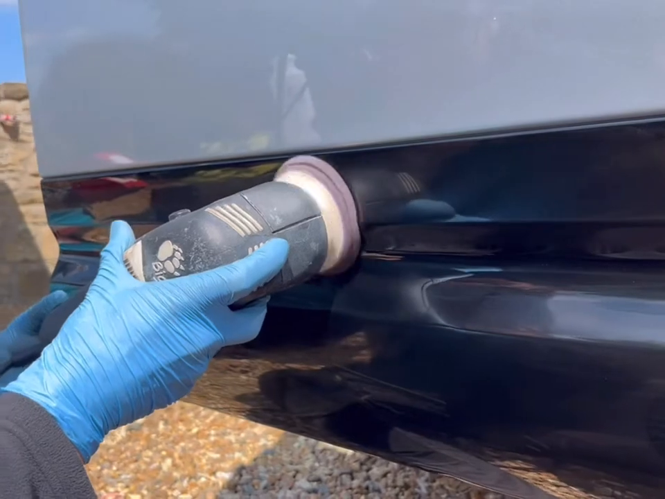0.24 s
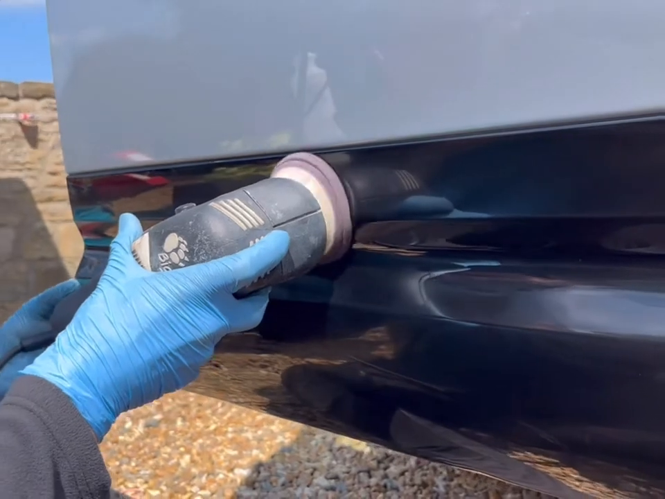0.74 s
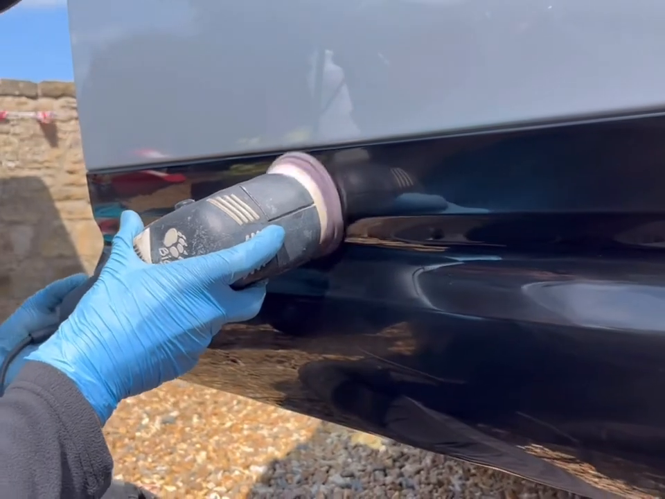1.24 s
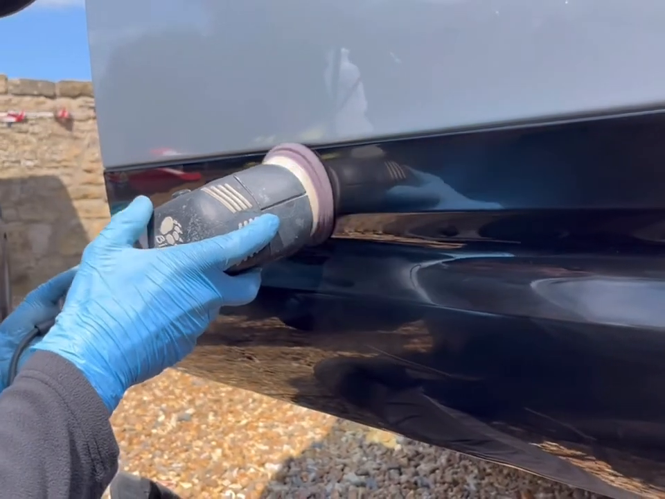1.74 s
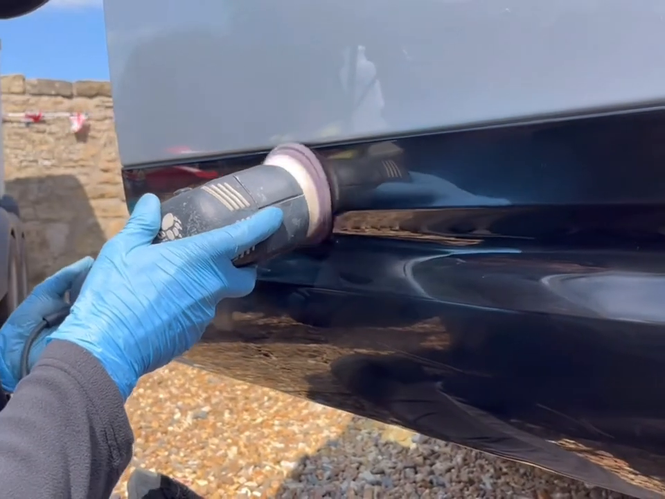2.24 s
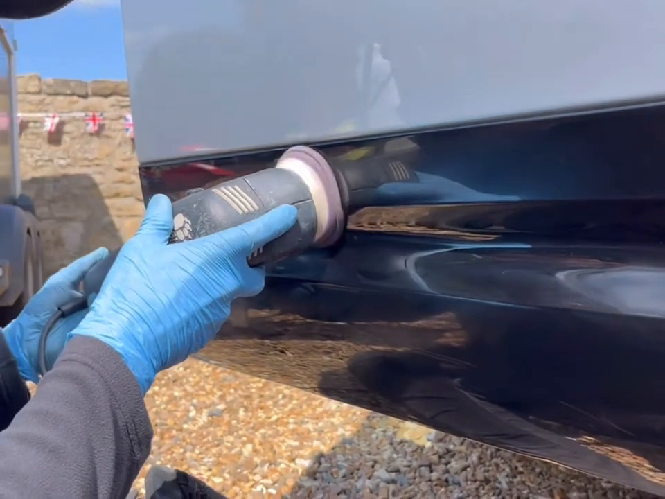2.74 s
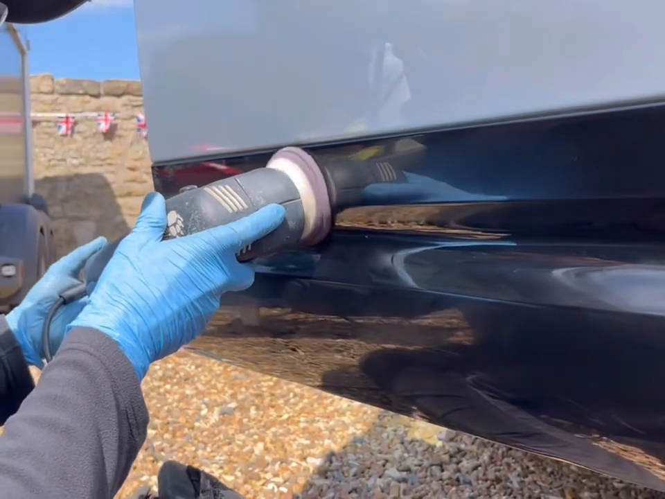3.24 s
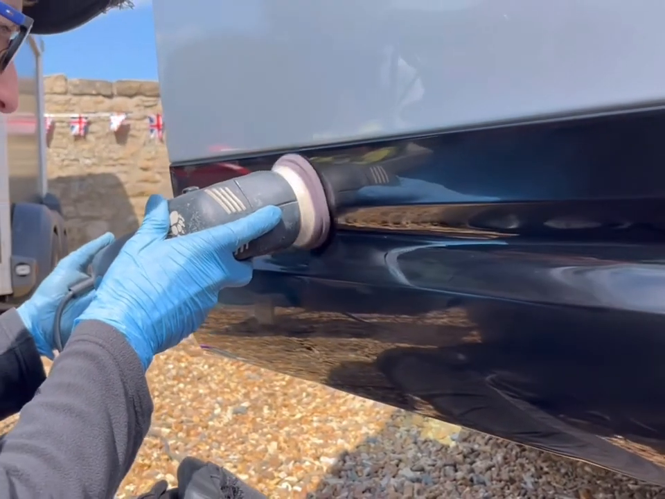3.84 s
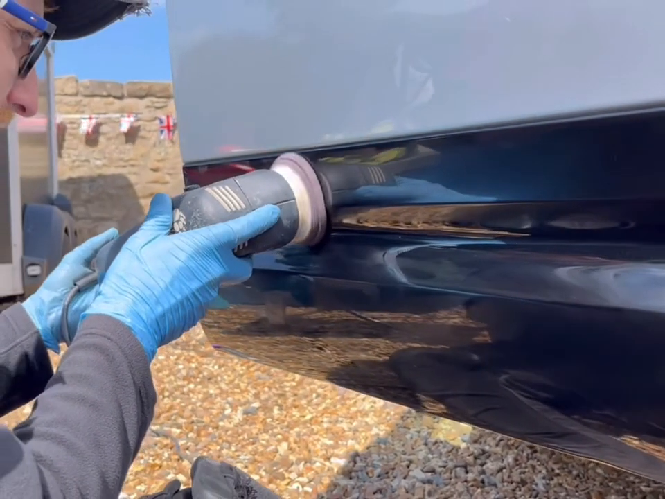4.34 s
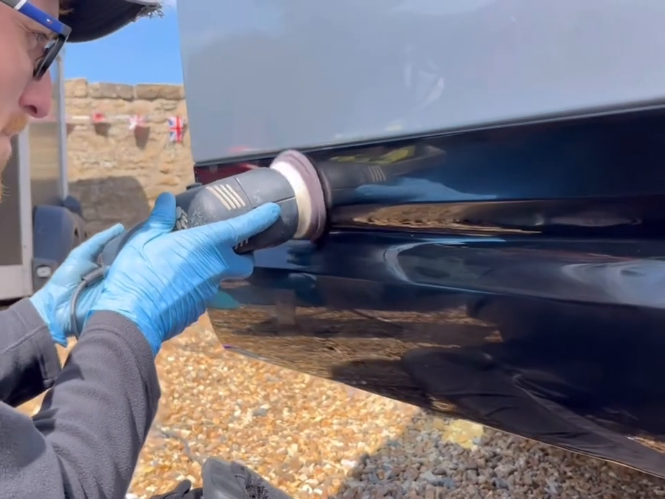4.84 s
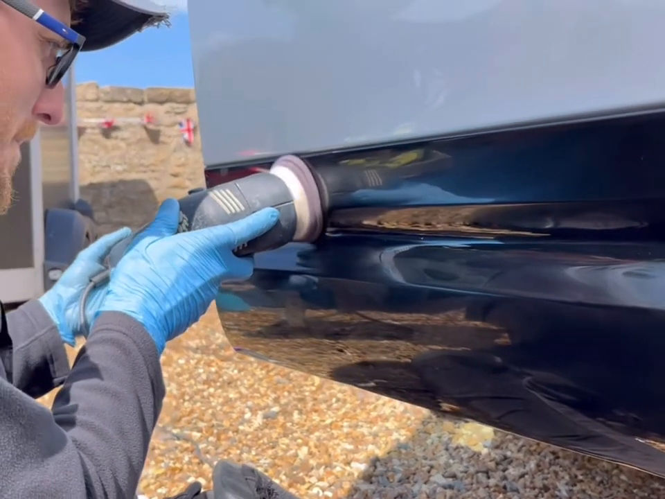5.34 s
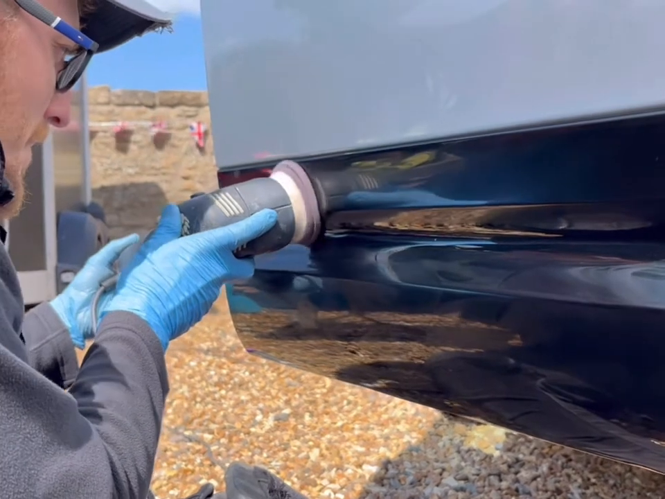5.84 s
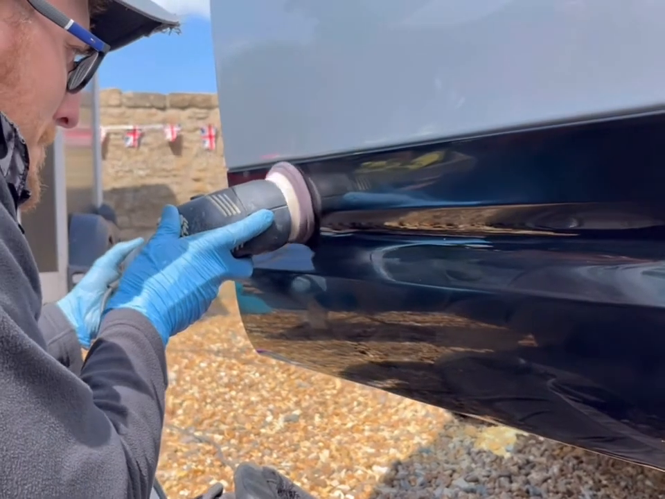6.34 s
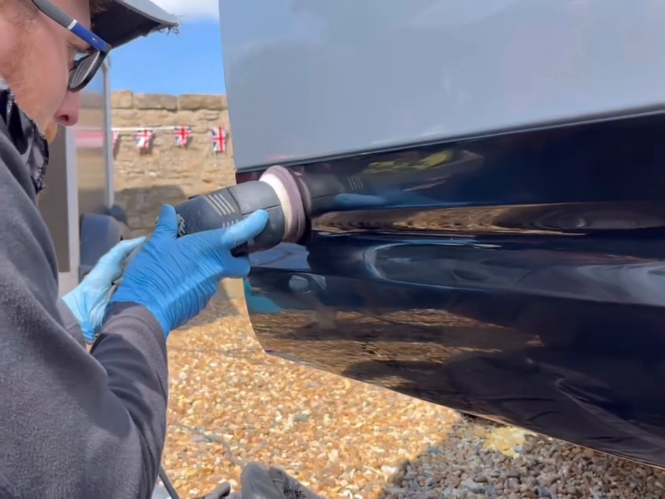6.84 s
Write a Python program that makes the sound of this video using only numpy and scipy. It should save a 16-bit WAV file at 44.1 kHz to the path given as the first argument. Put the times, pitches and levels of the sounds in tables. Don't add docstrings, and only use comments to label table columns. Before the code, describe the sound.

Close phone pickup in open air of a power buffer working on a vehicle body. A deep droning hum from the vibrating panel dominates, strongest around two seconds, beneath a nearly constant metallic whine, rattly casing buzz and breathy cooling-air hiss. Low wind puffs hit the microphone early and become sparse. The machine gradually gets a little quieter and thinner, still running at the end.

```python
import sys
import numpy as np
from scipy import signal
from scipy.fft import rfft, irfft, next_fast_len
from scipy.io import wavfile
from scipy.ndimage import uniform_filter1d

SR = 44100
rng = np.random.default_rng(int(sys.argv[2]) if len(sys.argv) > 2 else 0)


def wrap_up_sound(samples):
    columns = np.atleast_2d(samples).T
    tamed = np.clip(columns, -1, 1)
    steps = np.round(tamed * 32767).astype(np.int16)
    wavfile.write(sys.argv[1], SR, steps)


def rack_gain(trim_db):
    fader = np.asarray(trim_db, float)
    return 10 ** (fader / 20)


N = 313551
TIME = np.arange(N) / SR
COARSE = TIME[::32]
SIZE = next_fast_len(N)
HZ = np.maximum(np.fft.rfftfreq(SIZE, 1 / SR), 1)
PINION_TEETH, CROWN_TEETH = 9, 43
MAINS_RIPPLE_HZ = 100


def curves(table):
    s, *columns = np.transpose(table)
    return [np.interp(TIME, s, column) for column in columns]


def across(table):
    hz, *columns = np.transpose(table)
    return [np.interp(np.log(HZ), np.log(hz), column) for column in columns]


def unit(x):
    return x / np.sqrt(np.mean(x ** 2))


def turn(hz):
    return 2 * np.pi * np.cumsum(hz * np.ones(N)) / SR


def pad_turn(shaft):
    return shaft * PINION_TEETH / CROWN_TEETH


def bell(s, length_s):
    return np.exp(-((TIME - s) / length_s) ** 2)


def walk(rate, coarse=False):
    hold = int(1 / COARSE[1] / rate)
    slow = np.repeat(rng.standard_normal(len(COARSE) // hold + 1), hold)
    slow = uniform_filter1d(uniform_filter1d(slow, hold), hold)
    slow = unit(slow[:len(COARSE)])
    return slow if coarse else np.interp(TIME, COARSE, slow)


def coloured(table):
    spectrum = rfft(rng.standard_normal((2, SIZE))) * rack_gain(across(table)[0])
    return unit(irfft(spectrum, SIZE)[:, :N])


def ring(hz, width_hz):
    slow = rng.standard_normal((2, N)) + 1j * rng.standard_normal((2, N))
    pole = np.exp(-1.55 * np.pi * width_hz / SR)
    slow = signal.lfilter([1], np.convolve([1, -pole], [1, -pole]), slow)
    return unit((slow * np.exp(1j * turn(hz))).real)


def throb(shaft, orbit, ripple, spin, flicker_db):
    beat = 1 + orbit * np.cos(pad_turn(shaft))
    beat = beat + ripple * np.cos(turn(MAINS_RIPPLE_HZ)) + spin * np.cos(shaft)
    return beat * rack_gain(flicker_db * walk(28))


# time in seconds, orbit tone in dB,
# second harmonic from the pad's tilt in dB against that tone.
DRUMMING = [(0, -18, -20), (.35, -13.5, -24.5), (.6, -14.6, -22), (1, -14, -22.5), (1.45, -13, -24),
            (1.6, -12.7, -22.5), (2.1, -12, -20.5), (2.35, -13, -21), (2.65, -14.5, -18.5),
            (3.1, -14.2, -20.5), (3.5, -16, -21), (3.8, -16.4, -22), (4.1, -15, -26.5), (4.7, -16, -28),
            (5.1, -17, -29.5), (5.8, -19, -31.5), (6.5, -19, -39), (7.11, -20.3, -37)]
# time in seconds, length in seconds, change in dB.
STILL_SPOTS = [
    (.62, 0.11, -14),
    (2.3, 0.34, -22),
    (3.7, .3, -0.5),
]
# time in seconds, change in dB.
HUM_DIPS = [(.025, -3), (.05, -3.5), (.112, -4), (.198, -2), (.5, -4), (.72, -1), (.83, -1), (1.1, -2),
            (1.335, -2), (1.43, 0.5)]


def panel(shaft):
    pad = pad_turn(shaft)
    steady_db, tilt_db = curves(DRUMMING)
    first_db = steady_db + sum(db * bell(s, length_s=.015) for s, db in HUM_DIPS)
    second_db = steady_db + tilt_db
    third_db = steady_db - 29.5 - 1.0 * TIME
    third_db = third_db + sum(db * bell(s, length) for s, length, db in STILL_SPOTS)
    fourth_db = -49 - 3 * TIME
    drum = rack_gain(first_db + 0.41 * walk(9)) * np.cos(pad)
    drum = drum - rack_gain(second_db + 0.38 * walk(4.6)) * np.cos(2 * pad)
    drum = drum + rack_gain(third_db + 1.1 * walk(10)) * np.cos(3 * pad)
    drum = drum + rack_gain(fourth_db + 1.5 * walk(3.8)) * np.cos(4 * pad)
    return np.sqrt(2) * drum


# armature multiple, depth in dB, swings per second, starting point in turns.
FRINGES = [(2, 2.2, 0.12, 0.59), (6, 6.7, 0.14, 0.64), (6, 1.5, 0.33, 0.93), (7, 6.9, 0.13, 0.73),
           (7, 2.4, 0.72, 0.95), (9, 6.3, 0.07, 0.88), (9, 1.6, 0.87, 0.93), (12, 4.6, 0.1, 0.58),
           (12, 1.4, 0.48, 0.09), (18, 3.6, 0.7, 0.77), (18, 3.0, 0.33, 0.69), (18, 2.2, 0.06, 0.94),
           (24, 3.8, 0.18, 0.73), (24, 2.1, 1.11, 0.39), (24, 2.0, 0.93, 0.02), (30, 2.9, 0.07, 0.52),
           (30, 1.8, 0.77, 0.79), (30, 1.7, 1.0, 0.0), (36, 2.3, 0.34, 0.98), (36, 2.4, 1.12, 0.57),
           (36, 1.7, 0.17, 0.81)]


def fringed(order, near_db, far_db):
    swings = [db * np.cos(2 * np.pi * (rate * COARSE - start)) for k, db, rate, start in FRINGES if k == order]
    return near_db + np.interp(COARSE, TIME, far_db) + sum(swings)


# multiple of armature speed, level when near in dB.
STRONG_ORDERS = [(2, -37.9), (6, -38.2), (7, -44.6), (9, -40.3), (12, -40.5), (18, -40.2), (24, -41.8),
                 (30, -45.3), (36, -41)]
# multiple of armature speed, level in dB.
STEADY_ORDERS = [(1, -50), (3, -47), (4, -51), (5, -48), (8, -46), (10, -51)]
# multiple of armature speed, steps of pad speed, steps of mains ripple, level in dB.
SIDE_LINES = [(1, -1, 0, -62), (3, 0, -1, -50), (5, 0, -1, -55), (8, -2, 0, -48), (8, -1, 0, -49),
              (8, 0, 1, -54), (9, -2, 0, -53), (12, 0, -1, -50), (12, 0, -2, -56), (18, -1, 0, -63),
              (30, 1, 0, -63), (36, 1, 0, -63)]


def whine(shaft, far_db):
    named = [(order, fringed(order, db, far_db)) for order, db in STRONG_ORDERS] + STEADY_ORDERS
    faint = [(order, -48 - .5 * order) for order in range(11, 39) if order not in dict(named)]
    tones = [(order, 0, 0, db) for order, db in named + faint] + SIDE_LINES
    pad, ripple = pad_turn(shaft), turn(MAINS_RIPPLE_HZ)
    out = 0
    for order, orbits, ripples, db in tones:
        phase = order * shaft + orbits * pad + ripples * ripple
        waver = walk(30, coarse=True)
        gain = np.interp(TIME, COARSE, rack_gain(db + (1.3 + .05 * order) * waver - .4))
        slip = np.interp(TIME, COARSE, .5 * waver[::-1] + 2 * np.pi * rng.random())
        out = out + gain * np.cos(phase + slip)
    return np.sqrt(2) * out


# pitch in Hz, width in Hz, level in dB.
SHELL = [(593.3, 103, -6), (688.8, 124, 0.5), (770.5, 104, -3.5), (982, 130, -4), (1120.4, 101, 3),
         (1421, 210, -1.5)]
# pitch in Hz, width in Hz, level in dB against the vent.
LOUVRES = [(2011, 280, -11.5), (3890, 220, -11.5)]


def casing(shaft, far_db, aim_db):
    shell_db = -29.6 + 0.25 * far_db - 0.056 * aim_db
    gear_db = -34 + 0.68 * far_db - 0.15 * aim_db
    vent_db = -29.5 + 1.5 * far_db + 0.13 * aim_db
    grille_db = -36 + 1.5 * far_db + 0.34 * aim_db
    gear_db = gear_db + 3.6 * bell(5.0, length_s=0.71)
    grille_db = grille_db + 4.4 * bell(3.3, length_s=0.54)

    shell = unit(sum(rack_gain(db + .7 * walk(20)) * ring(hz, width) for hz, width, db in SHELL))
    shell = rack_gain(shell_db) * shell * throb(shaft, orbit=.1, ripple=.14, spin=.16, flicker_db=.6)

    vent = ring(3050, width_hz=230)
    vent = vent + sum(rack_gain(db + 0.95 * walk(2.2)) * ring(hz, width) for hz, width, db in LOUVRES)
    gears = rack_gain(gear_db) * ring(2660, width_hz=330)
    chatter = (gears + rack_gain(vent_db) * vent) * rack_gain(.6 * walk(14))
    chatter = chatter * throb(shaft, orbit=.2, ripple=.1, spin=.16, flicker_db=1.3)

    grille_hz = 6147 + 99.5 * far_db
    grille = ring(grille_hz, width_hz=410) * throb(shaft, orbit=.05, ripple=.2, spin=.1, flicker_db=2)
    return shell + chatter + rack_gain(grille_db) * grille


# pitch in Hz, strength in dB per Hz.
AIR = [(200, -69), (350, -76), (470, -67), (900, -66), (1680, -72), (2300, -66), (3700, -76), (5300, -69),
       (7000, -70), (8700, -69), (9900, -74), (10800, -70), (13000, -77), (15000, -81)]


def fan(shaft, far_db, aim_db):
    hiss = coloured(AIR)
    top = irfft(rfft(hiss, SIZE) * (HZ > 6900), SIZE)[:, :N]
    body = (hiss - top) * rack_gain(.3 * far_db + .7)
    body = body * throb(shaft, orbit=.05, ripple=.09, spin=.05, flicker_db=.6)
    top = top * rack_gain(aim_db + .6 * walk(40))
    baffle = rack_gain(-7.5 + 1.1 * walk(7.4)) * ring(4580, width_hz=490)
    return rack_gain(-28.5 + far_db) * (body + top + baffle)


# time in seconds, level in dB.
BREEZE = [
    (0, -39.5),
    (1.55, -44.5),
    (1.7, -48),
    (2.9, -49),
    (5.4, -57),
    (7.11, -50),
]
# gust time in seconds, length in seconds, flutter in dB, rumble in dB.
GUSTS = [(.01, 0.029, -40, -28), (0.076, 0.044, -29.5, -29), (0.627, 0.12, -38, -41), (1, 0.055, -36, -46),
         (1.17, 0.045, -38, -33), (1.313, 0.045, -29, -27), (1.44, 0.071, -34, -28), (1.78, .04, -48, -32),
         (1.92, .06, -44, -36), (2.63, .07, -42, -39), (2.87, .04, -53, -42), (3.12, .04, -55, -45),
         (3.85, .05, -57, -48), (5.95, .08, -51, -45), (6.16, .05, -40, -37), (7.11, .04, -45, -38)]
# time in seconds, level in dB.
PUFFS = [(0.052, -20), (0.099, -21), (0.14, -28), (0.222, -28), (0.43, -24), (0.543, -37), (0.642, -27),
         (0.819, -30), (1.03, -29), (1.149, -25), (1.31, -18), (1.375, -19), (1.439, -17.5)]
# pitch in Hz, strength in dB per Hz.
FLUTTER = [(20, -60), (45, -27), (85, -6.5), (125, 1.5), (210, -13.5), (330, -17.5), (480, -32), (900, -94)]
# pitch in Hz, strength in dB per Hz.
RUMBLE = [(12, -36), (30, -22), (55, -5.5), (70, -1.5), (100, -32), (200, -92)]


def wind():
    breeze_db = curves(BREEZE)[0]
    flutter = rack_gain(breeze_db - 2.2 + 3.3 * walk(10))
    flutter = flutter + sum(rack_gain(db - 4.5) * bell(s, length) for s, length, db, _ in GUSTS)
    rumble = rack_gain(breeze_db + 4.5 + 4 * walk(7.2))
    rumble = rumble + sum(rack_gain(db) * bell(s, length) for s, length, _, db in GUSTS)
    puffs = sum(rack_gain(db - 5) * bell(s + .012, length_s=.009) for s, db in PUFFS)
    shared, apart = coloured(FLUTTER) * (flutter + puffs) + coloured(RUMBLE) * rumble
    return np.array([shared + 0.25 * apart, shared - 0.18 * apart])


# pitch in Hz, lead of the left port in radians,
# left minus right in dB, likeness from 0 to 1.
PORTS = [(80, -.24, -1.4, .97), (400, -.55, 1, .85), (700, .4, -3.7, .92), (1400, .45, -3.7, .88),
         (1900, 0, 0, .95), (2350, .9, 0, .7), (2700, .75, -1.4, .85), (3300, 1.8, 2, .75),
         (3600, .9, 1.5, .1), (4200, 0, 0, .85), (6200, -.9, 2.5, .75), (7700, -2.75, 0, .9),
         (8650, -3.2, 0, .99), (11200, -6.2, 0, .88), (13200, -6.6, 0, .85), (14600, -9.2, 0, .9)]


def ports(tones, noise):
    lead, tilt_db, likeness = across(PORTS)
    likeness = np.clip(likeness, 0, 1)
    shared = rfft(tones, SIZE) + np.sqrt((1 + likeness) / 2) * rfft(noise[0], SIZE)
    apart = np.sqrt((1 - likeness) / 2) * rfft(noise[1], SIZE)
    skew = rack_gain(tilt_db / 2) * np.exp(1j * lead / 2)
    return irfft([(shared + apart) * skew, (shared - apart) / skew], SIZE)[:, :N]


# time in seconds, armature speed in Hz.
SPEED = [(0, 390.32), (.3, 390.06), (.9, 390.83), (1.5, 391.91), (1.8, 392.72), (2.1, 392.61),
         (2.7, 391.87), (3.3, 391.76), (3.75, 391.35), (4.2, 391.65), (4.5, 391.57), (4.8, 391.18),
         (5.4, 391.77), (6, 391.13), (6.3, 390.59), (7.11, 390.48)]
# time in seconds, change with distance in dB,
# aim of the fan outlet at the phone in dB.
TOOL = [(0, 0, 0), (.9, -0.47, -0.4), (1.5, 0, -2.4), (2.1, -1.5, 0.2), (2.55, -1.9, 0.9), (3, -2.23, 1.5),
        (3.3, -2, 1.5), (3.6, -2, -0.6), (4.2, -2.5, 0), (4.5, -3, -0.8), (5.1, -3.5, 1.9),
        (5.4, -3.5, -0.3), (6, -3, 2), (6.3, -3.5, 0.3), (6.6, -3.5, -0.7), (6.9, -4.5, 1),
        (7.11, -4.5, 0.7)]


def scene():
    shaft = turn(curves(SPEED)[0])
    far_db, aim_db = curves(TOOL)
    tones = panel(shaft) + whine(shaft, far_db)
    noise = casing(shaft, far_db, aim_db) + fan(shaft, far_db, aim_db)
    return ports(tones, noise) + wind()


def low_pass(x):
    return signal.sosfilt(signal.butter(12, 15420, fs=SR, output="sos"), x)


def record(dry):
    return low_pass(dry)


dry = scene()
out = record(dry)
wrap_up_sound(out)
```